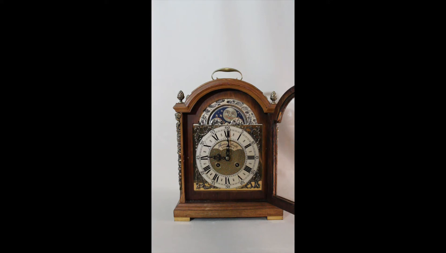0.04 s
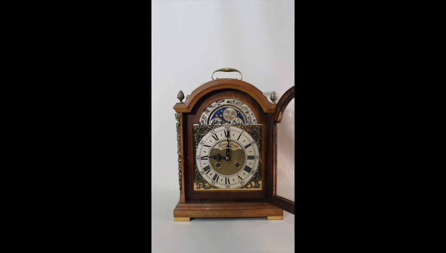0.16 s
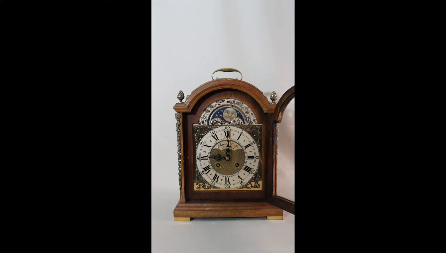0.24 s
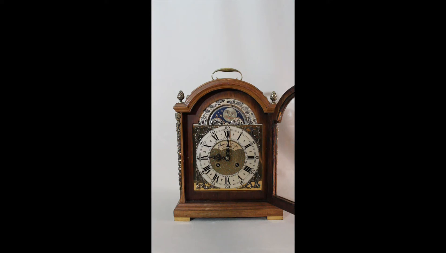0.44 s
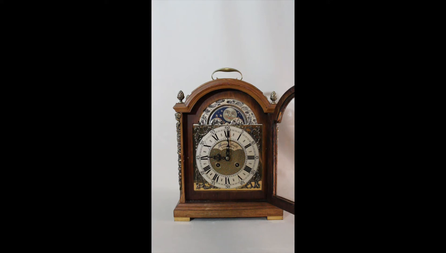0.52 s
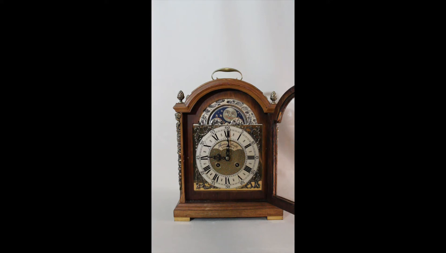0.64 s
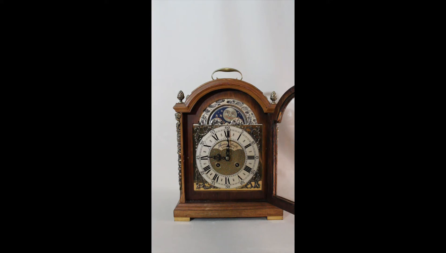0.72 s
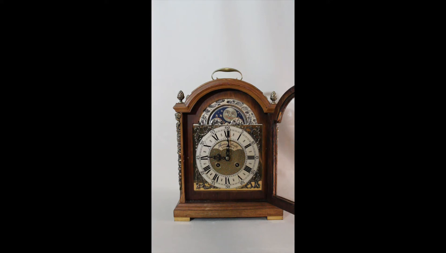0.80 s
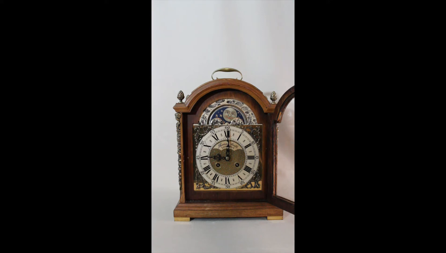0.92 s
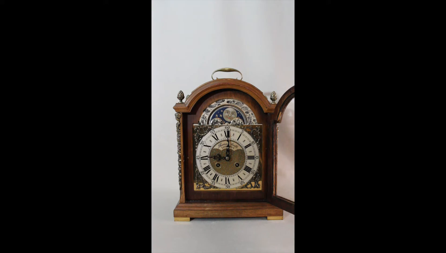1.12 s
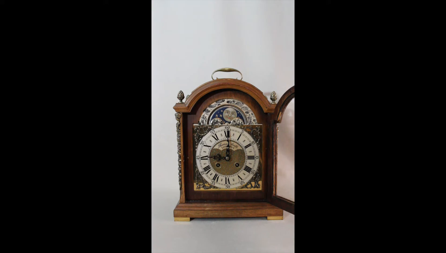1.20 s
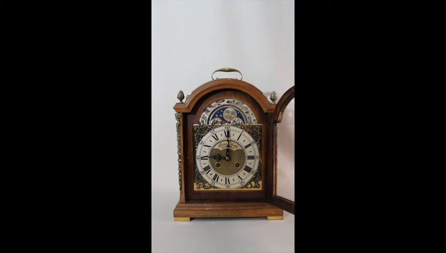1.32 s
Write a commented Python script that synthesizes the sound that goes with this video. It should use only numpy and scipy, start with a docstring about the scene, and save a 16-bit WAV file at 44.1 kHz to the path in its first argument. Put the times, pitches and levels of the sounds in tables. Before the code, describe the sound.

One bright, wavering chime from a mechanical clock, fading slowly over faint clicks of its gears.

```python
"""A wooden bracket clock strikes once, close by in a quiet room.
At first its steel rod still hums from the stroke before, and the works tick and click faintly.
A lever clacks and lets the hammer fall: it cracks against the rod and the wooden case knocks.
A limiter ducks the first moments of the ring, then the rod's tones waver slowly as they die.
Under them the striking gears knock softly as they turn, and a few dull bumps sound far off."""
import sys
import numpy as np
from scipy import signal
from scipy.fft import rfft, irfft
from scipy.io import wavfile

SR = 44100
rng = np.random.default_rng(int(sys.argv[2]) if len(sys.argv) > 2 else 0)


def materialize(psi):
    """Save the field psi as 16-bit PCM at rate SR to the path in sys.argv[1].

    A 1-D psi becomes a single channel; in a 2-D psi each row is a channel.
    """
    bounded = np.clip(np.atleast_2d(psi).T, -1, 1)
    quanta = np.round(bounded * 32767).astype(np.int16)
    wavfile.write(sys.argv[1], SR, quanta)


N = 59535
STRIKE_S = .2042


def amp(db):
    """Turns decibels into a gain."""
    return 10 ** (np.asarray(db) / 20)


def since(s):
    """Seconds since time s, zero before it."""
    return np.maximum(np.arange(N) / SR - s, 0)


def dying(t, rise_s, t60_s):
    """A quick rise, then a fade; t60 is the time it takes to fall by 60 dB."""
    return (1 - np.exp(-t / rise_s)) * np.exp(-np.log(1000) * t / t60_s)


def noise(gain):
    """Noise of level 1, shaped by a function of frequency."""
    x = irfft(rfft(rng.standard_normal(N)) * gain(np.fft.rfftfreq(N, 1 / SR)), N)
    return x / x.std()


def coloured(points):
    """Noise whose colour follows points of f/Hz, relative level/dB."""
    hz, db = np.transpose(points)
    return noise(lambda f: amp(np.interp(np.log(f + 1), np.log(hz), db)))


def tone(hz, t):
    """A pure tone of level 1, starting anywhere in its cycle."""
    return np.sqrt(2) * np.cos(2 * np.pi * (hz * t + rng.random()))


def taps(rows, hz, width_hz, t60_s, rise_s):
    """Small contacts, each a burst of noise around one pitch."""
    ring = noise(lambda f: 1 / (1 + ((f - hz) / width_hz) ** 2) ** 2)
    return ring * sum(amp(db) * dying(since(s), rise_s, t60_s) for s, db in rows)


def struck(s, modes):
    """A small part, tapped at time s, rings with its own tones (its modes)."""
    t = since(s)
    return sum(amp(db) * dying(t, rise_s=.0011, t60_s=t60) * tone(hz, t) for hz, db, t60 in modes)


def room_tone():
    """The steady, low hush of the room."""
    # colour of the hush: f/Hz, relative level/dB
    hush = [(20, -4), (45, -6), (66, 3.5), (85, -6), (140, -3), (200, -3.5), (300, -7), (450, -9),
            (800, -11.5), (1600, -14.5), (4000, -18), (8000, -27.5), (12000, -29), (15500, -22.5)]
    return amp(-52.5) * coloured(hush)


def old_ring():
    """The rod hums from the stroke before until the hammer stops it."""
    # lingering tones: f/Hz, starting level/dB, change/(dB per s)
    tones = [(1099, -47, 7), (2830, -55, 48.5), (5015.1, -54, -3), (7600, -57.5, -10)]
    t = since(0)
    stopped = np.exp(-since(STRIKE_S) / .011)
    return stopped * sum(amp(db + slope * t) * tone(hz, t) for hz, db, slope in tones)


def ticks():
    """The running works give thin, very high ticks."""
    # ticks: t/s, level/dB
    hits = [(.0653, -47), (.1486, -54), (.682, -52), (.8609, -48), (1.1174, -50), (1.1957, -51)]
    return taps(hits, hz=15000, width_hz=900, t60_s=.025, rise_s=.0006)


def gear_clicks():
    """The gears click lightly and ring for a moment."""
    # clicks: t/s, level/dB
    hits = [(.152, -49), (.4226, -50.5), (.6066, -51), (.682, -55), (.8805, -45.5), (.9414, -52),
            (1.0122, -61), (1.1195, -59), (1.2, -54)]
    # tones of the gears: f/Hz, relative level/dB, t60/s
    modes = [(2230, -2.5, 0.072), (2360, -3, 0.059)]
    return sum(amp(db) * struck(s, modes) for s, db in hits)


def lever():
    """The lever lets the hammer go with a hollow clack."""
    # colour of its scuff: f/Hz, relative level/dB
    colour = [(100, -26), (400, 1.5), (600, -5), (850, 3.5), (1400, -6), (2000, -14), (5000, -15),
              (7000, -17), (12000, -39)]
    # tones of the lever: f/Hz, level/dB, t60/s
    modes = [(455, -51, .15), (608.5, -50.5, 0.39), (870, -47, 0.1), (930, -45.5, 0.13),
             (1340, -43.5, .042)]
    release_s = .1605
    scuff = amp(-43) * dying(since(release_s), rise_s=.0011, t60_s=.065) * coloured(colour)
    return struck(release_s, modes) + scuff


def blow():
    """The hammer lands with a crack, the case knocks, and the room echoes."""
    # short tones of the wooden case: f/Hz, level/dB, t60/s
    case = [(141, -38.5, 0.092), (360, -36, 0.097), (468, -36, 0.094), (929, -29, 0.062),
            (1020, -30, 0.088), (1410, -49, 0.025), (1658, -43.5, 0.13), (1880, -41, 0.091),
            (2268, -36.5, 0.17), (3400, -53, 0.013), (5360, -35.5, 0.08), (7130, -41, 0.032)]
    # pings of the block that holds the rod: f/Hz, level/dB, t60/s
    mount = [(2826, -25, .16), (5023, -29, .16)]
    # colour of the hammer's contact: f/Hz, relative level/dB
    crack_colour = [(100, -25), (400, -19.5), (1000, -8), (1700, -11), (2800, -1.5), (4000, -4),
                    (6200, -4.5), (7600, 4), (8800, -22), (10300, 3.5), (11800, -12), (13800, 7),
                    (16000, -12)]
    # colour of the echo: f/Hz, relative level/dB
    echo_colour = [(100, -3.5), (400, -8), (1000, -3), (2500, -11), (6000, -2), (9000, -17), (14000, -11.5),
                   (16000, -18)]
    t, rise_cycles = since(STRIKE_S), 1.2
    knock = sum(amp(db) * dying(t, rise_cycles / hz, t60) * tone(hz, t) for hz, db, t60 in case + mount)
    crack = amp(-14) * dying(t, rise_s=.0001, t60_s=.021) * coloured(crack_colour)
    early_echo = amp(-27.5) * dying(t, rise_s=.007, t60_s=.15)
    late_echo = amp(-45.5) * dying(t, rise_s=.007, t60_s=.71)
    return knock + crack + (early_echo + late_echo) * coloured(echo_colour)


def rod():
    """The rod swings in two directions at slightly different rates, so every tone wavers (beats)."""
    # the rod's tones, each with a close twin: f/Hz, level/dB, t60/s, twin's offset/Hz,
    # twin's relative strength, time from the blow to a dip in the beat/s, build-up/s
    modes = [(1095.4, -37.2, 17.77, 9.1, 0.1, 0.25, 0.012), (2191, -63.9, 12.07, 1.73, 0.2, 0.918, 0.0012),
             (2828.7, -33.3, 11.08, -1.5, 0.63, 0.562, 0.01),
             (3696.4, -45.2, 3.64, 2.31, 0.06, 0.831, 0.0012), (5015.3, -31.2, 5.4, 2.28, 0.17, 0.5, 0.06),
             (6120.2, -45.0, 0.63, 3.0, 0.64, 0.197, 0.0012),
             (6661.9, -52.0, 1.42, 2.61, 0.8, 0.35, 0.0012),
             (7596.4, -16.1, 3.63, 2.39, 0.08, 0.399, 0.0012),
             (10020.5, -31.2, 0.62, -3.0, 0.72, 0.217, 0.0012),
             (10562, -29.3, 1.5, -2.26, 0.6, 0.348, 0.0012),
             (11496.4, -50.7, 3.59, 2.49, 0.07, 0.392, 0.0012),
             (12611.8, -54.8, 2.39, 2.18, 0.26, 0.434, 0.0012),
             (13772, -30.2, 0.4, 2.0, 0.33, 0.147, 0.0012),
             (13920.5, -14.8, 0.63, -2.5, 0.74, 0.213, 0.0012), (15397, -63, 4.5, 2, 0.05, 0.4, 0.0012)]
    t, ring = since(STRIKE_S), np.zeros(N)
    for hz, db, t60, offset_hz, share, dip_s, build_s in modes:
        beat = 1 - share * np.exp(2j * np.pi * offset_hz * (t - dip_s))
        swing = beat * np.exp(2j * np.pi * (hz * t + rng.random()))
        swell = (1 - np.exp(-t / build_s)) ** 1.6  # the power softens the start
        fade = np.exp(-np.log(1000) * t / t60)
        ring += np.sqrt(2) * amp(db) * swell * fade * swing.real
    return ring


def train_knocks():
    """The strike train, the gears that drive the hammer, knocks softly as it turns."""
    # knocks: t/s, level/dB
    hits = [(0.547, -43), (.677, -54), (0.878, -38.5), (.895, -55), (1.209, -44)]
    # tones of the train: f/Hz, relative level/dB, t60/s
    modes = [(1210, -4.5, 0.05), (1294, -4, 0.066)]
    return sum(amp(db) * struck(s, modes) for s, db in hits)


def bumps():
    """A few dull, distant bumps."""
    # bumps: t/s, level/dB
    hits = [(.997, -48.5), (1.026, -53), (1.168, -50), (1.225, -56.5)]
    return taps(hits, hz=185, width_hz=116, t60_s=.36, rise_s=.0049)


def scene():
    """The clock in its room, in mono."""
    clock = rod() + old_ring() + blow() + lever() + train_knocks() + gear_clicks() + ticks()
    return (clock + room_tone() + bumps())[None]


def record(dry):
    """A limiter turns the loud blow down and recovers steadily; then the highest treble is cut."""
    limit_db, recover_db_per_s, fast_share = -17.5, 39, .34
    power = signal.lfilter(np.ones(128) / 128, [1], dry[0] ** 2)  # averaged over about 3 ms
    cut_db = .87 * np.maximum(10 * np.log10(power + 1e-12) - limit_db, 0)
    recovery = recover_db_per_s * since(0)
    held_db = np.maximum.accumulate(cut_db + recovery) - recovery  # each cut eases off at that rate
    duck_db = fast_share * lag(held_db, seconds=.00067) + (1 - fast_share) * lag(held_db, seconds=.021)
    low_pass = signal.firwin(255, 16000, window=("kaiser", 8), fs=SR)
    return signal.oaconvolve(dry * amp(-duck_db), low_pass[None], "same")


def lag(x, seconds):
    """Follows x smoothly, a little late."""
    keep = np.exp(-1 / (seconds * SR))
    return signal.lfilter([1 - keep], [1, -keep], x)


dry = scene()
out = record(dry)
materialize(out)
```